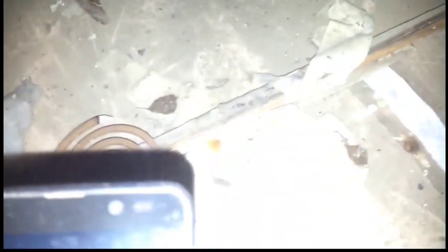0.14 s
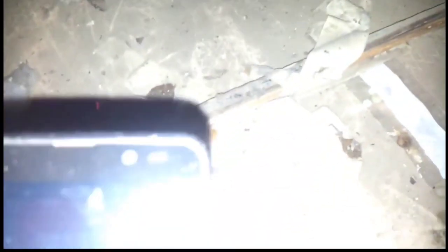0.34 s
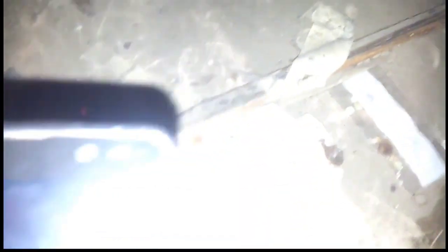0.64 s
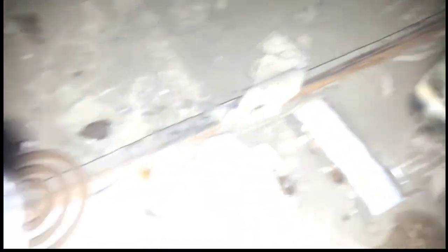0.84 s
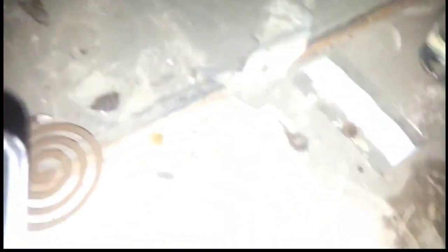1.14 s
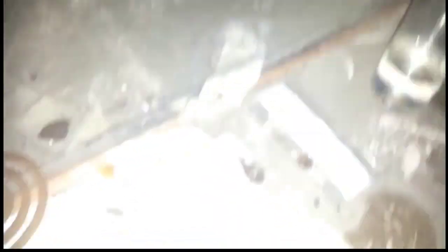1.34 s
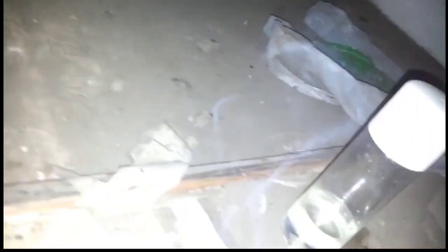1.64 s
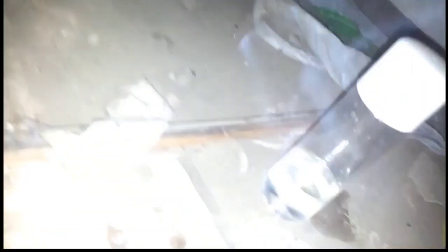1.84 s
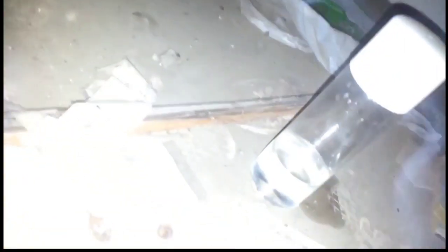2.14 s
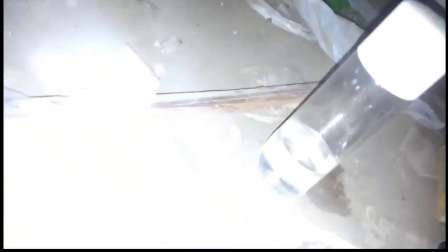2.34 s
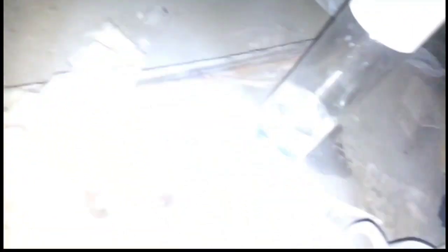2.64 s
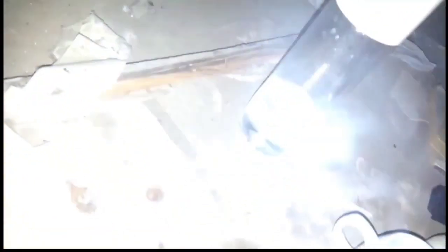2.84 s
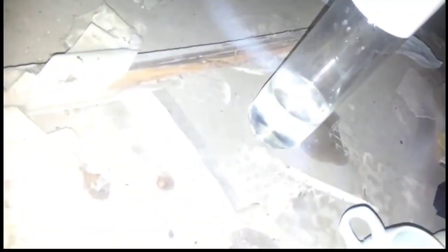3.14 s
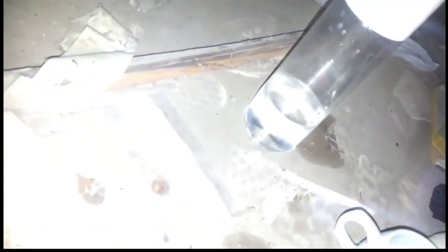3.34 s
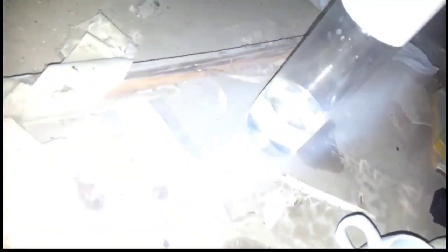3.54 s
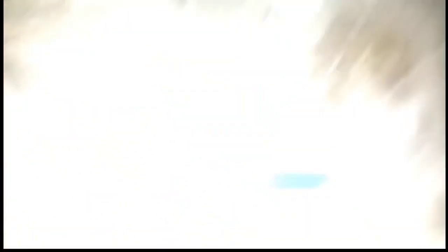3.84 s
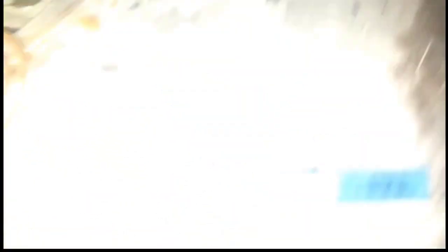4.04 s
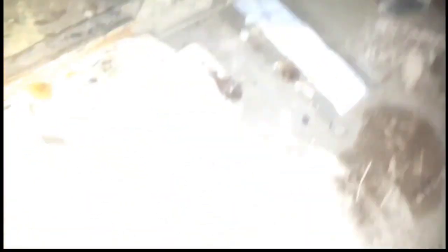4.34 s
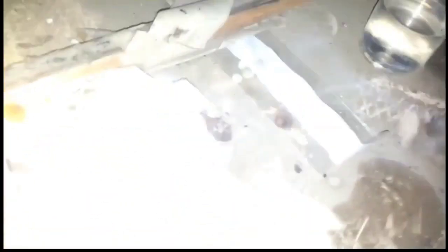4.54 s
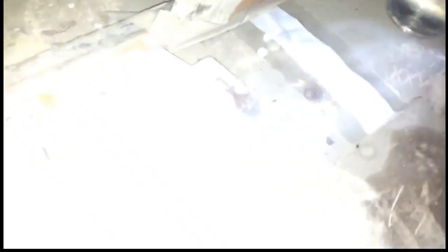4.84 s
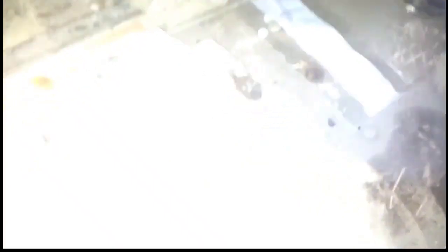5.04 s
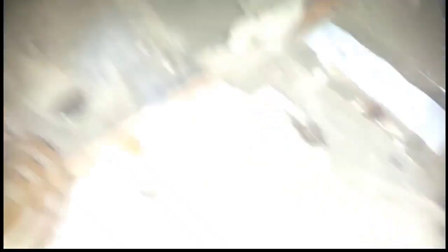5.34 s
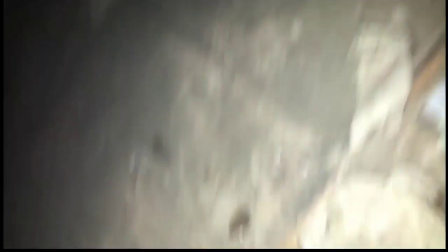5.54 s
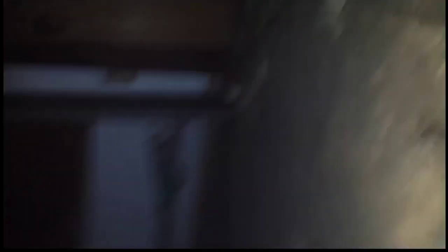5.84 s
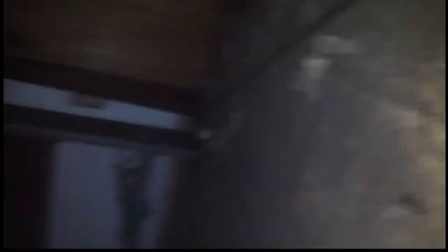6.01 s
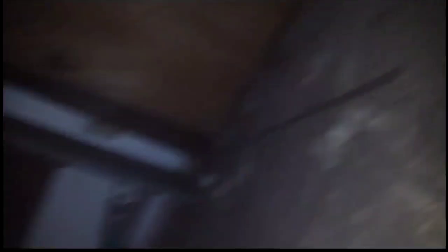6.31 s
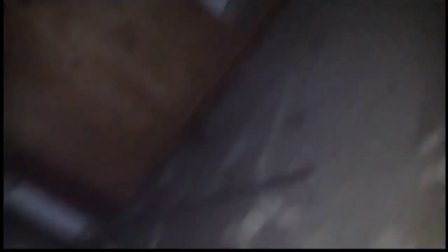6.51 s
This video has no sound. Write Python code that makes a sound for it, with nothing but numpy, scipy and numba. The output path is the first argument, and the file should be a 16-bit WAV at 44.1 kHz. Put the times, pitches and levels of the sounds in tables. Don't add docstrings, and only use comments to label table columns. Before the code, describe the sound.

Very close, dry handling noise from fingers on plastic: light ticks, a heavy muffled thump and rough drag early on, then over two seconds of near silence with smooth hiss and fading rumble. One loud clipped crack breaks in, followed by thin hissy rustles around the uncovered microphone hole, little clicks, a short run of rapid stick-slip chatter, and soft brushes to the end.

```python
import sys
import numpy as np
from scipy import signal
from scipy.fft import rfft, irfft
from scipy.io import wavfile
from scipy.ndimage import uniform_filter1d, minimum_filter1d
from numba import njit

SR = 44100
rng = np.random.default_rng(int(sys.argv[2]) if len(sys.argv) > 2 else 0)


def rack_gain(trim_db):
    fader = np.asarray(trim_db, float)
    return 10 ** (fader / 20)


def put_to_file(sound):
    columns = np.atleast_2d(sound).T
    safe = np.clip(columns, -1, 1)
    whole_steps = np.round(safe * 32767)
    wavfile.write(sys.argv[1], SR, whole_steps.astype(np.int16))


N = 294225
TIME = np.arange(N) / SR
PORT_FREE_S = 4.07


def unit(x):
    return x / np.sqrt(np.mean(x ** 2))


@njit
def svf(x, hz, width):
    y, b, l = np.empty(len(x)), 0., 0.
    for i in range(len(x)):
        g, k = np.tan(np.pi * hz[i] / SR), width[i] / hz[i]
        v = (b + g * (x[i] - l)) / (1 + g * (g + k))
        b, l, y[i] = 2 * v - b, l + 2 * g * v, k * v
    return y


def band(x, hz, width):
    return svf(x, np.full(N, 1. * hz), np.full(N, 1. * width))


def body(x, modes):
    total = np.zeros(N)
    for k, (hz, width, db) in enumerate(modes):
        total += (-1) ** k * rack_gain(db) * band(x, hz, width)
    return unit(total)


def walk(rate):
    hold = int(SR / rate)
    steps = np.repeat(rng.standard_normal(N // hold + 1), hold)
    return 0.59 * uniform_filter1d(uniform_filter1d(steps, hold), hold)[:N]


def add(track, s, wave):
    i = int(s * SR)
    track[i:i + len(wave)] += wave[:N - i]


def port(x):
    # time in seconds, centre in Hz, width in Hz.
    opening = [
        (4.05, 7200, 6500),
        (4.06, 7562, 2485),
        (4.075, 10460, 2800),
        (4.41, 11500, 3800),
        (5.1, 11000, 3403),
        (5.3, 10200, 2980),
        (5.45, 10900, 3125),
        (6.67, 11400, 3116),
    ]
    s, hz, width = np.transpose(opening)
    hz = np.interp(TIME, s, hz) * (1 + 0.079 * walk(25))
    width = np.interp(TIME, s, width)
    peak = svf(svf(x, hz, width), hz, 2.1 * width)
    return peak - 0.22 * band(x, 13600, 2100) - .1 * band(x, 5800, 6000)


def strokes(shapes, levels_db):
    gains = rack_gain(np.array(levels_db))
    out = np.zeros((gains.shape[1], N))
    for (s, rise, hold, fall), gain in zip(np.abs(shapes), gains):
        near = slice(max(int((s - 2 * rise) * SR), 0), int((s + hold + 2 * fall) * SR))
        t = TIME[near] - s
        outside = np.maximum(np.maximum(-t / rise, (t - hold) / fall), 0)
        out[:, near] += gain[:, None] * rack_gain(-30 * outside)
    return out


def room():
    # frequency in Hz, level in dB per Hz.
    hiss_colour = [(53, -36.5), (90, -6), (170, -0.5), (355, -4), (700, -4), (1460, -7.5), (2500, -7.5),
                   (6000, -11.5), (11000, -9.5), (14500, -10)]
    # time in seconds, level in dB.
    rumble_fade = [
        (0, -61.5),
        (2.6, -68.5),
        (4.5, -73.5),
        (6.67, -76.5),
    ]
    # start of the hold, rise before it, hold and fall in seconds, level in dB.
    whistle_swell = (4.58, .2, .68, .1, -76)
    hz, db = np.transpose(hiss_colour)
    f = np.fft.rfftfreq(N, 1 / SR) + 1
    colour = rack_gain(np.interp(np.log(f), np.log(hz), db, left=-40))
    hiss = irfft(rfft(rng.standard_normal(N)) * colour, N)
    rumble = band(band(rng.standard_normal(N), 44, 30), 41, 68) * rack_gain(2.0 * walk(5))
    rumble_gain = rack_gain(np.interp(TIME, *np.transpose(rumble_fade)) - 2.5)
    whistle = band(band(rng.standard_normal(N), 3780, 160), 3780, 300)
    far = rack_gain(2.9 * walk(8)) * strokes([whistle_swell[:-1]], [whistle_swell[-1:]])[0]
    return rack_gain(-65.5) * unit(hiss) + rumble_gain * unit(rumble) + far * unit(whistle)


def touch():
    # time in seconds, pressure in dB, speed in dB over the pressure.
    drag_path = [
        (1.215, -76, 0),
        (1.251, -32.5, -20),
        (1.264, -16, -5.5),
        (1.276, -18, -7.5),
        (1.29, -20, 2.5),
        (1.335, -22, 6.5),
        (1.358, -25.5, -1),
        (1.386, -30.5, -11.5),
        (1.44, -71, -7),
    ]
    # start (for slides the middle, for pulls the lift-off) in seconds, #
    # length in seconds, scrape, shell and port levels in dB. A slope's length is the time it takes to move 30
    # dB. # Snaps start at once and die over their length.
    snaps = [(1.066, .012, -56, -57, -73), (1.169, .045, -67, -38, -90), (1.4815, .012, -32, -31, -48),
             (1.09, .015, -62, -54, -75), (4.037, .025, -66, -58, -76), (4.0595, .012, -23, -20, -26),
             (4.256, .1, -59, -56, -45), (4.402, .055, -58, -50, -38), (5.13, .012, -59, -36, -35),
             (5.419, .03, -62, -52, -58), (5.318, .09, -75, -61, -70), (6.226, .2, -73, -78, -58),
             (1.184, .02, -54, -52, -78)]
    scuffs = [
        (4.065, 0.015, -41.5, -41, -27.5),
        (4.13, 0.95, -92, -102, -71),
        (5.0439, 0.037, -49.5, -47, -42),
        (5.088, 0.0316, -44.5, -47.5, -38.5),
        (5.133, 0.031, -45.5, -42, -41),
        (5.375, .062, -71, -61, -52.5),
        (5.45, 1.3, -76, -79.5, -65),
    ]
    slides = [
        (0.951, .3, -71, -65.5, -82.5),
        (2.05, 0.31, -67.5, -68.5, -82),
        (5.355, 0.076, -63, -67, -47),
        (5.94, 0.1, -73, -75, -60),
    ]
    brushes = [
        (5.641, 0.0237, -67, -65.5, -49),
        (5.715, 0.061, -78, -79, -56.5),
        (5.98, .04, -73, -72, -54),
        (6.075, .022, -76.5, -76, -50),
        (6.135, .012, -84, -78, -58),
        (6.312, .055, -72, -78, -51),
        (6.375, 0.047, -68, -82, -48.5),
        (6.525, .035, -82, -75.5, -59.5),
        (6.664, .02, -73.5, -76.5, -53.5),
    ]
    pulls = [
        (1.152, 0.022, -66, -45.5, -88),
        (4.24, 0.3, -74.5, -68.5, -64.5),
        (4.371, .22, -61.5, -62, -50),
        (5.033, 0.078, -74, -65, -61),
        (5.29, 0.21, -63, -67.5, -53),
        (5.596, 0.097, -74, -80, -54.5),
        (5.855, .2, -79, -83, -54.5),
        (6.035, .08, -73, -81, -49),
    ]
    s, press_db, speed_db = np.transpose(drag_path)
    levels = (press_db + speed_db, press_db, press_db + 1.6 * speed_db - 13)
    drag = [rack_gain(np.interp(TIME, s, db, left=-140, right=-140)) for db in levels]
    onset_s, lift_s, crest_share = .005, .036, .08
    shapes = [(s, onset_s, 0, t) for s, t, *_ in snaps]
    shapes += [(s, onset_s, t, lift_s) for s, t, *_ in scuffs]
    shapes += [(s, 0.025, t, 0.0677) for s, t, *_ in brushes]
    shapes += [(s, t, 0, lift_s) for s, t, *_ in pulls]
    shapes += [(s - crest_share * t / 2, t, crest_share * t, t) for s, t, *_ in slides]
    rows = [row for table in (snaps, scuffs, brushes, pulls, slides) for row in table]
    return np.array(drag) + strokes(shapes, [row[2:] for row in rows])


def rubbing():
    # start of the hold, rise before it, hold and fall in seconds,
    # # level in dB.
    pushes = [(.58, .25, 0.49, 0.166, -69.5), (1.068, .04, 0.0167, 0.052, -51),
              (1.162, .07, 0.0067, 0.029, -30.5), (1.232, .015, 0.005, .02, -36.5),
              (1.304, .012, 0.039, .07, -30.5), (3.701, .02, 0.145, .1, -67.5),
              (4.088, .012, 0.0029, 0.03, -40.5), (4.149, .1, 0.27, 0.156, -69),
              (5.07, 0.038, 0.11, .07, -50), (5.3, 0.108, .04, 0.169, -63), (5.549, 0.14, 0.13, 0.172, -69),
              (5.751, .1, 0.025, 0.29, -66), (5.986, 0.09, .02, .15, -67.5)]
    # centre in Hz, width in Hz, level in dB.
    scrape_modes = [(1988.4, 1100, 0), (3430, 1400, 1.5), (4990, 2100, -3)]
    # centre in Hz, width in Hz, level in dB.
    shell_modes = [(230, 160, -0.5), (550, 310, -0.5), (900, 650, -2.5), (1500, 910, -6.5)]
    scrape, shell, air = touch()
    sway = strokes([p[:-1] for p in pushes], [p[-1:] for p in pushes])[0]
    judder = walk(500)
    noise = rng.standard_normal((4, N))
    grit = noise[0] * rack_gain(6.2 * judder + 1.8 * walk(90))
    fizz = noise[1] * rack_gain(2.5 * judder + 0.5 * walk(100) + 1.5 * walk(35))
    knead = noise[2] * rack_gain(2.4 * walk(70))
    firm = np.interp(TIME, [4.0, 4.2], [1, .22])
    mount = firm * band(band(noise[3], 57, 35), 94, 130)
    mount += 0.12 * band(noise[3], 130, 190) / firm ** .3
    rubbed = scrape * body(grit, scrape_modes) + shell * body(knead, shell_modes)
    return rubbed + air * unit(port(fizz)) + sway * unit(mount)


def knocks():
    # time in seconds, tick level in dB, flex level in dB, flex pitch in Hz.
    taps = [(1.0595, -35, -33, 1400), (1.09, -47, -52, 800), (1.1192, -52, -40, 900),
            (1.151, -50, -27.5, 395), (1.1654, -50, -9, 560), (1.1834, -55, -42, 900),
            (1.2598, -17, -30, 900), (1.4748, -50.5, -46, 900), (1.4803, -31, -14.5, 1500),
            (3.8887, -75, -35.5, 1200), (3.8894, -75, -32, 330), (3.974, -55.5, -50.5, 900),
            (4.0292, -54, -44, 900), (4.0352, -58, -35, 850), (4.0471, -54.5, -44, 600),
            (4.055, -39.5, -17, 785), (4.0574, 0.5, 1.5, 870), (4.192, -62, -54, 400),
            (4.2553, -32, -60, 505), (4.3933, -15, -35, 934), (4.403, -33, -28.5, 455),
            (5.316, -66, -60, 400), (5.3883, -34, -50, 2600), (5.417, -32, -28.5, 492),
            (5.602, -39, -66, 742), (5.662, -47, -50.5, 393), (6.553, -56, -57.5, 535)]
    # time
    # in seconds, level in dB, swing in Hz.
    jolts = [(1.0597, -32, 63.4), (1.09, -31, 62), (1.1192, -30.5, 67.6), (1.151, -33, 108),
             (1.1636, -20.5, 77), (1.4802, -23, 92.2), (3.645, -45, 77.3), (3.8935, -36, 77.5),
             (4.0354, -41.5, 100.3), (4.0472, -44.5, 100.1), (4.0583, -9.5, 125.2), (4.193, -58.5, 119),
             (4.2544, -51.5, 128.6), (4.402, -57.5, 114), (5.316, -48.5, 370), (5.324, -58, 398.5),
             (5.333, -64, 380), (5.662, -57, 82.6)]
    # centre in Hz, width in Hz, level in dB.
    crack_modes = [(1880, 490, -8.5), (3650, 870, 1), (6300, 1200, 1), (9100, 1700, 0), (12800, 3900, -6)]
    ticks, thuds, t = np.zeros(N), np.zeros(N), TIME[:SR // 8]
    spray_fade = np.exp(-t[:400] / .0003) + .1 * np.exp(-t[:400] / .003)
    for (s, tick_db, flex_db, flex_hz), grit in zip(taps, rng.standard_normal((len(taps), 400))):
        spray = np.tanh(2 * grit) * spray_fade
        spray[0] = 3.5
        add(ticks, s - .0002, rack_gain(tick_db) * spray / 2)
        turns = flex_hz * t
        flex = -np.sin(2 * np.pi * turns) * (1 - np.exp(-(turns / 0.12) ** 2)) * np.exp(-turns / 0.44)
        add(thuds, s - 0.27 / flex_hz, rack_gain(flex_db) * 1.9 * flex)
    for s, shake_db, shake_hz in jolts:
        turns = shake_hz * (t + 0.0016 * (1 - np.exp(-t / 0.0023)))
        fade = np.exp(-shake_hz * t / np.clip(-shake_db / 36, .35, 1.1))
        add(thuds, s, rack_gain(shake_db) * 1.5 * np.sin(2 * np.pi * turns) * fade)
    crack = sum(rack_gain(db) * band(ticks, hz, width) for hz, width, db in crack_modes)
    opened = np.interp(TIME, [PORT_FREE_S, PORT_FREE_S + .03], [0, 1])
    return (2.2 - 1.1 * opened) * crack + 2.3 * opened * port(ticks) + thuds


def bump():
    hard_bump = (1.2606, 1.2, 152, .46)
    s, db, hz, hurry = hard_bump
    t = TIME[:640] - .003
    turns = hz * t * np.where(t < 0, 2, 1) + hurry * (t / .01) ** 4
    fade = signal.windows.tukey(len(t), .45) * np.exp(-np.abs(t) / .03)
    out = np.zeros(N)
    add(out, s - .003, rack_gain(db) * np.cos(2 * np.pi * turns) * fade)
    return out


def slips():
    # time in seconds, shell level in dB.
    releases = [(1.2752, -9), (1.2846, -6), (1.29, -9), (1.295, -11), (1.31, -7), (1.3253, -5),
                (1.3359, -7), (1.3405, -8), (5.0427, -35), (5.0474, -37), (5.0545, -31), (5.0676, -33),
                (5.0749, -42), (5.086, -31), (5.0913, -27), (5.0955, -31), (5.1081, -30), (5.1162, -34),
                (5.1239, -36), (5.1326, -26), (5.138, -27), (5.1437, -28), (5.1469, -29), (5.15, -28),
                (5.1562, -27), (5.1626, -25), (5.1681, -33), (5.1726, -24)]
    # time in seconds, port level in dB.
    flicks = [(4.2679, -33), (4.2749, -39), (4.3348, -43), (5.0292, -46), (5.357, -38), (5.646, -41),
              (5.655, -43), (6.021, -39), (6.027, -39), (6.032, -37), (6.0385, -36), (6.074, -41),
              (6.081, -39), (6.09, -40)]
    air, shell, t = np.zeros(N), np.zeros(N), TIME[:300] - .002
    rows = [(s, db + (8 if s > PORT_FREE_S else -10.5), db) for s, db in releases]
    rows += [(s, db, db - 19) for s, db in flicks]
    for (s, port_db, shell_db), grit in zip(rows, rng.standard_normal((len(rows), 300))):
        burst = np.exp(-np.abs(t) / 0.00049) * np.tanh(2.5 * grit)
        add(air, s - .002, rack_gain(port_db) * 2.3 * burst)
        hz = 850 * 2 ** (.4 * grit[0])
        flex = np.exp(-(t * hz / .5) ** 2) * np.cos(2 * np.pi * hz * t + .5 * grit[1])
        add(shell, s - .002, -rack_gain(shell_db) * 0.78 * flex)
    return port(air) + shell


def scene():
    mono = room() + rubbing() + knocks() + bump() + slips()
    return np.array([mono, mono])


def starve(x, margin_db=19.0, scatter_db=4.0):
    f, t, z = signal.stft(x, SR, "cosine", nperseg=2048, noverlap=1024)
    edges_hz = np.r_[np.geomspace(300, 9840, num=63), np.linspace(10300, 14600, num=20)]
    slot = np.searchsorted(edges_hz, f)
    power = [np.mean(np.abs(z[slot == k]) ** 2, axis=0) + 1e-20 for k in range(84)]
    db = 10 * np.log10(power)
    luck = 1.7 * uniform_filter1d(rng.standard_normal(db.shape), size=3, axis=1) * scatter_db
    keep = db + luck > db[35:83].max(axis=0) - margin_db
    keep[50:63] = True
    edge = np.abs(np.gradient(x))
    crest = -minimum_filter1d(-edge, 2048) / uniform_filter1d(edge + 1e-9, 2048)
    keep[:, np.interp(t, TIME, crest) > 9] = True
    keep[:12] = True
    thinned = z * np.where(keep, 1, .1)[slot]
    return signal.istft(thinned, SR, "cosine", nperseg=2048, noverlap=1024)[1][:N]


def low_pass(x):
    return signal.sosfilt(signal.butter(12, 16480, fs=SR, output="sos"), x)


def record(dry):
    wet = signal.sosfilt(signal.butter(4, 48, "high", fs=SR, output="sos"), dry[0])
    wet = starve(np.clip(wet, -1, 1))
    wet = signal.sosfilt(signal.ellip(10, .2, 38, 14600, fs=SR, output="sos"), wet)
    apart = rack_gain(-37) * walk(1200) * (wet + 5.0 * np.gradient(wet))
    return low_pass(np.clip([wet + apart, wet - apart], -1, 1))


dry = scene()
out = record(dry)
put_to_file(out)
```